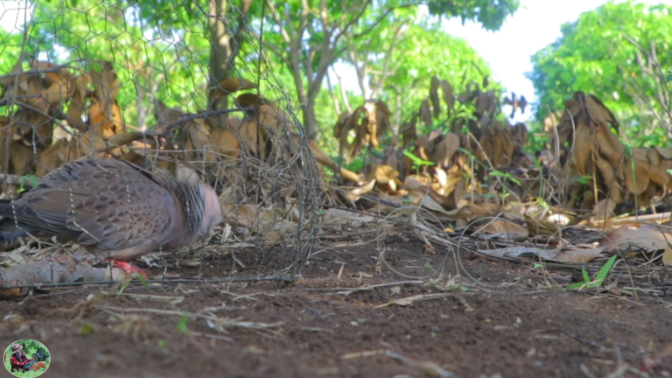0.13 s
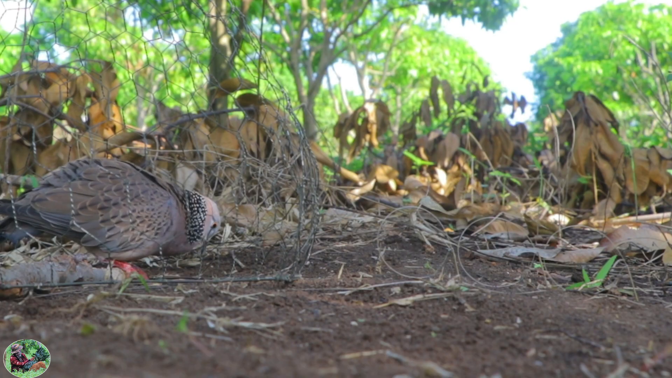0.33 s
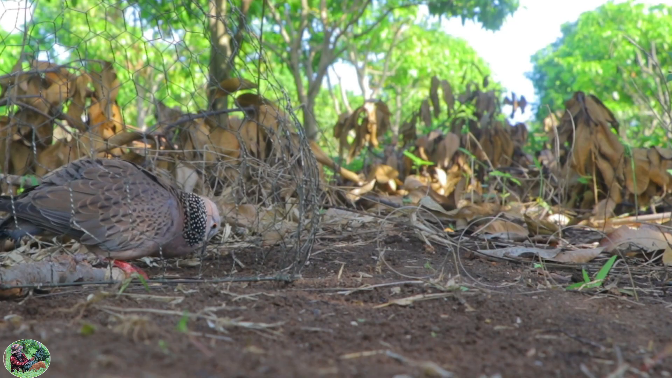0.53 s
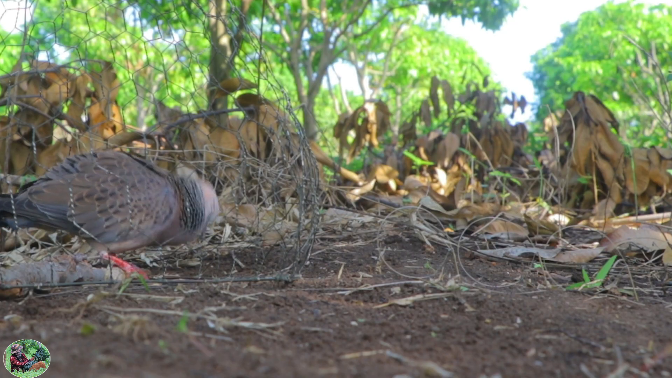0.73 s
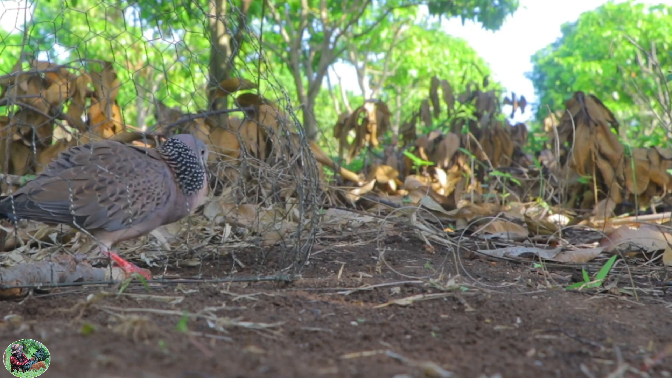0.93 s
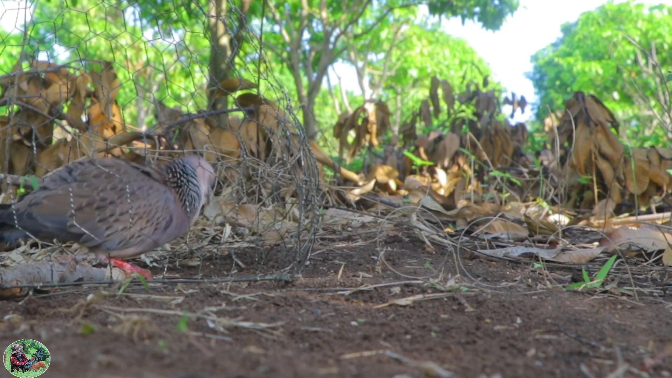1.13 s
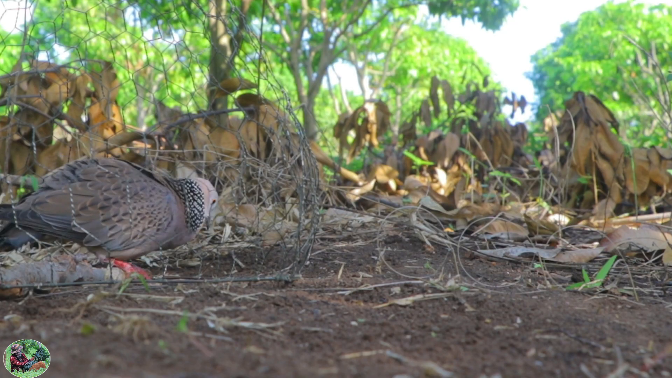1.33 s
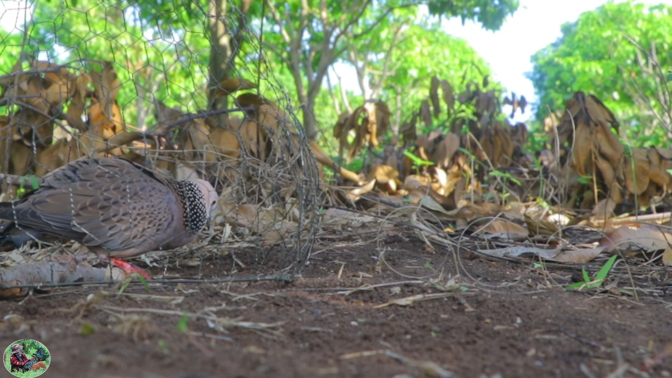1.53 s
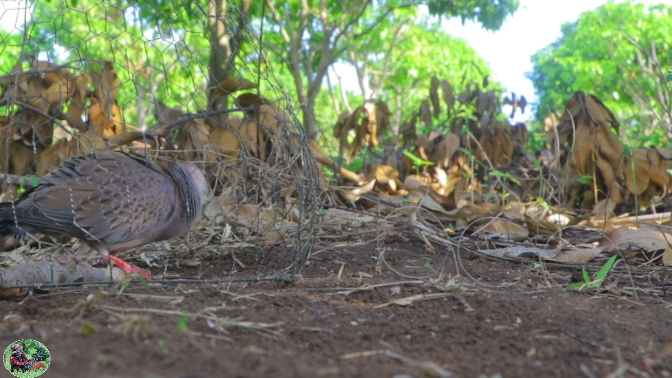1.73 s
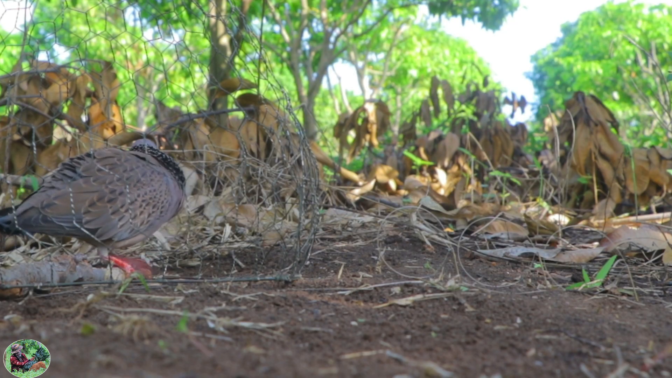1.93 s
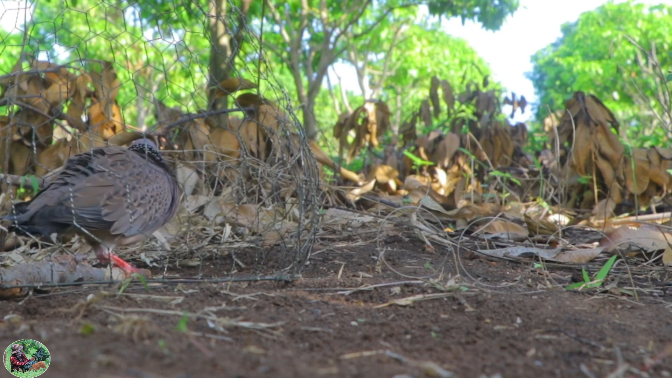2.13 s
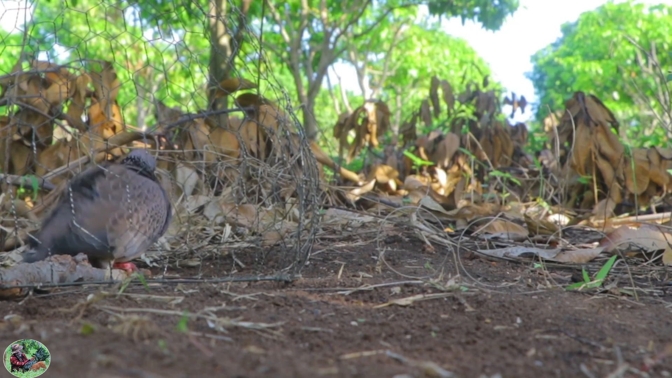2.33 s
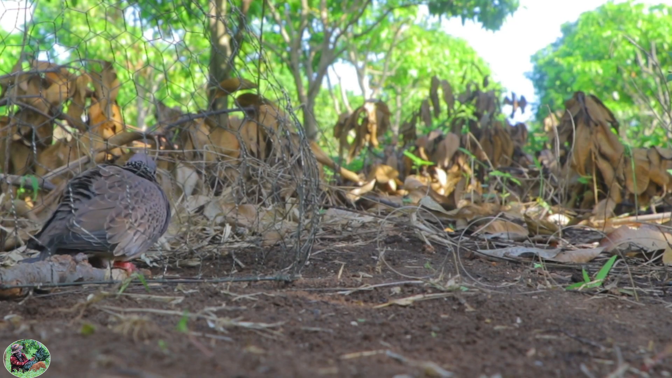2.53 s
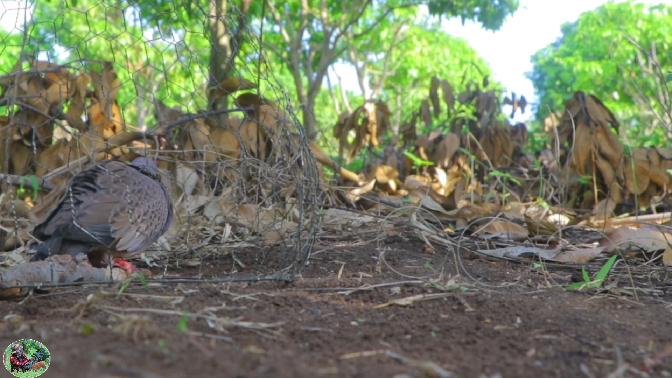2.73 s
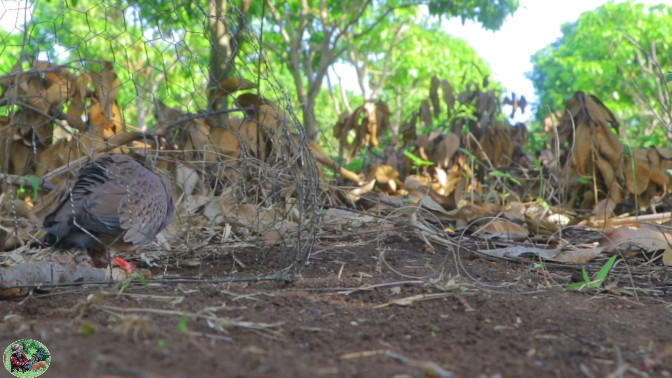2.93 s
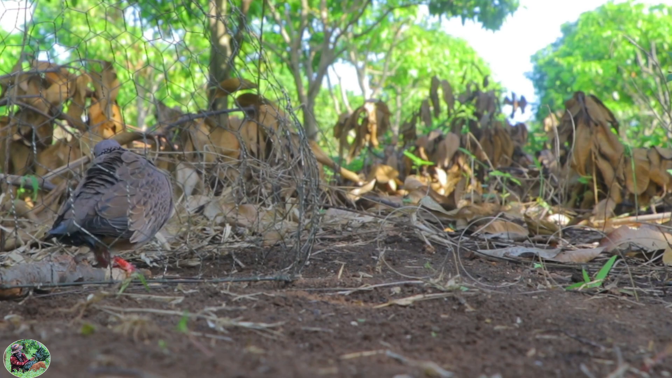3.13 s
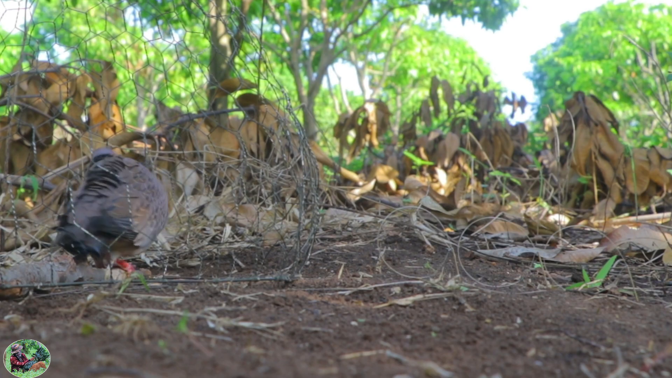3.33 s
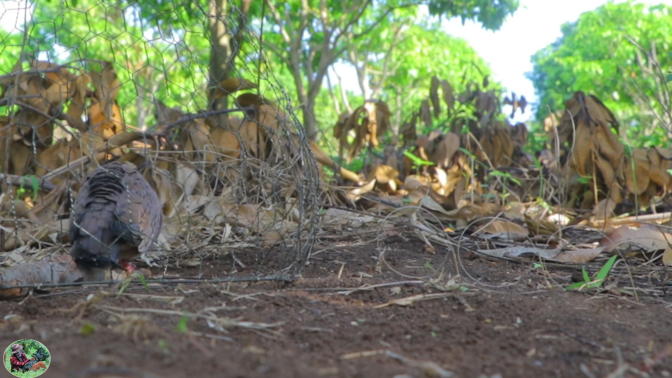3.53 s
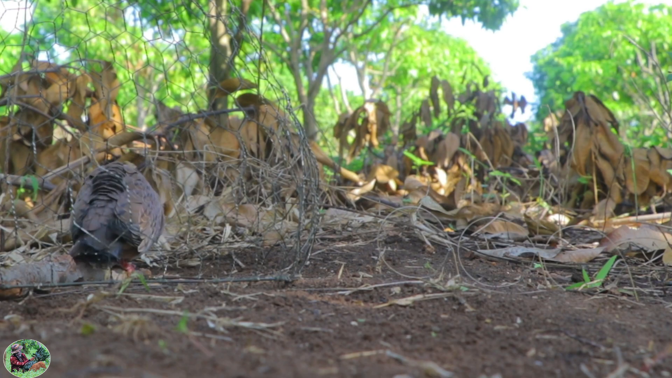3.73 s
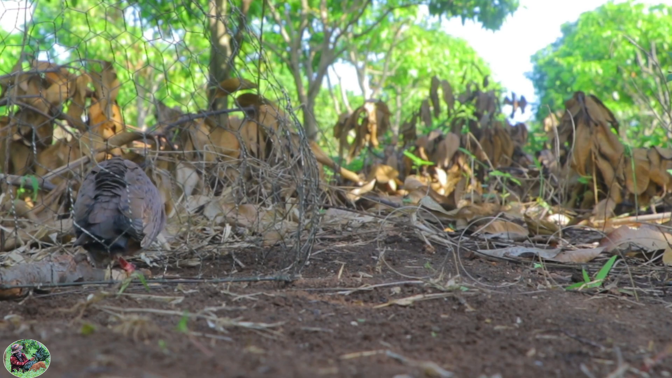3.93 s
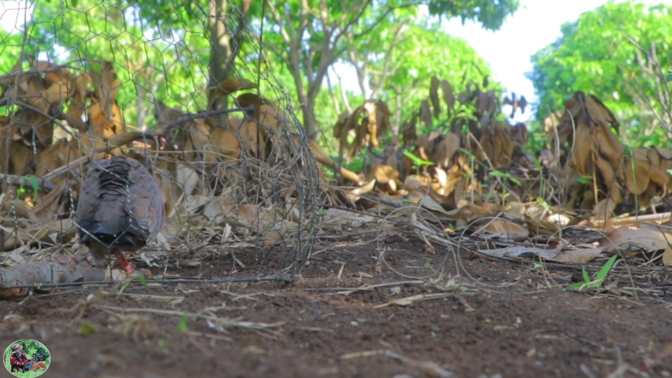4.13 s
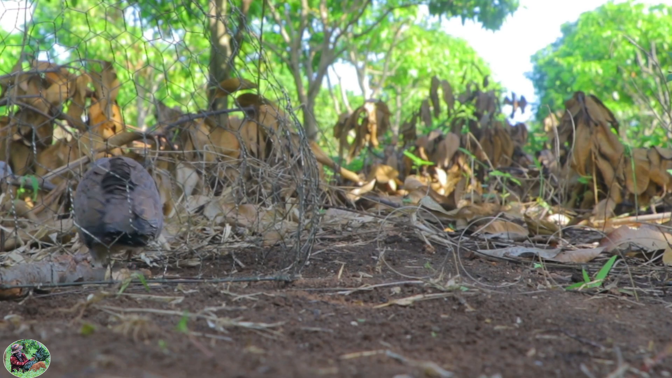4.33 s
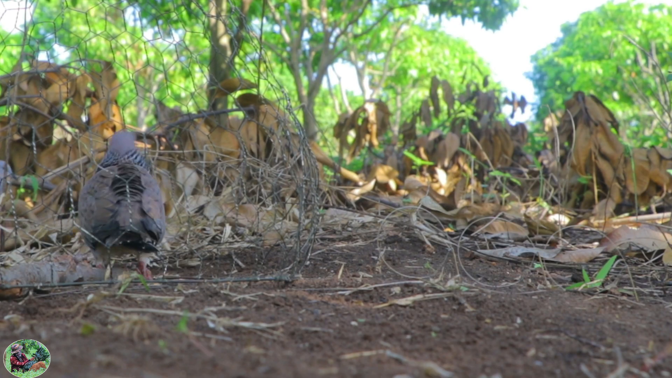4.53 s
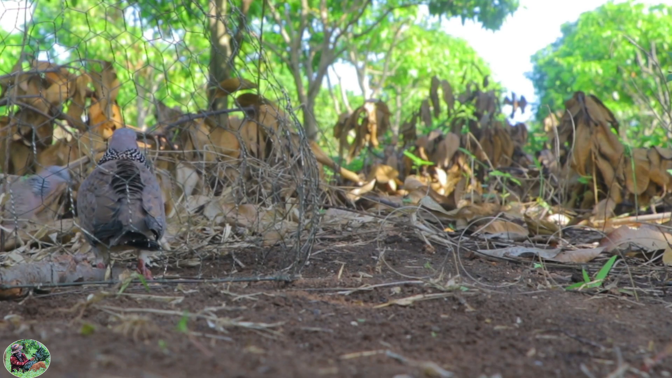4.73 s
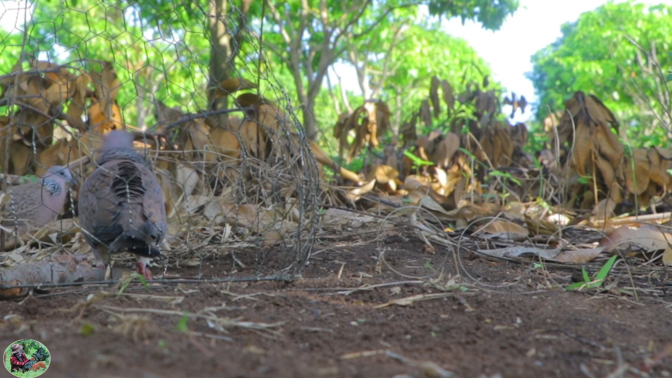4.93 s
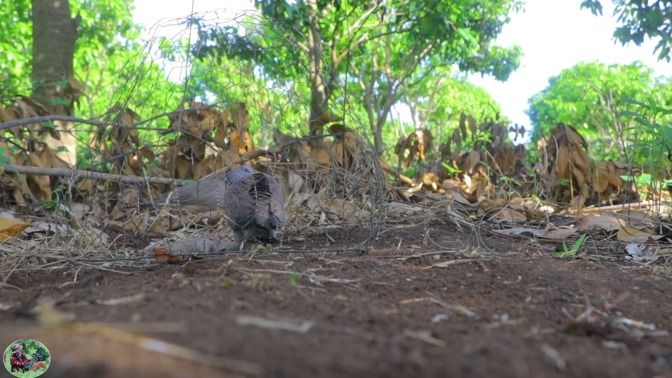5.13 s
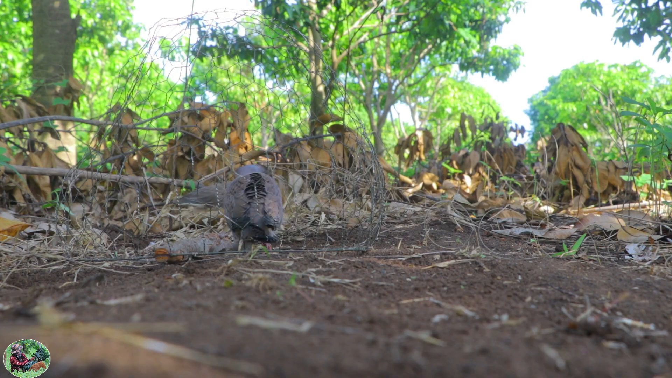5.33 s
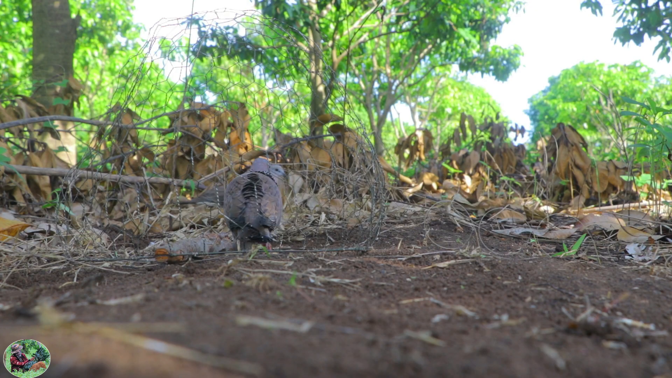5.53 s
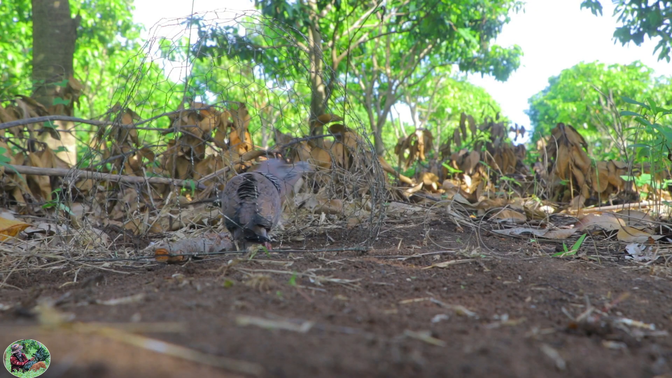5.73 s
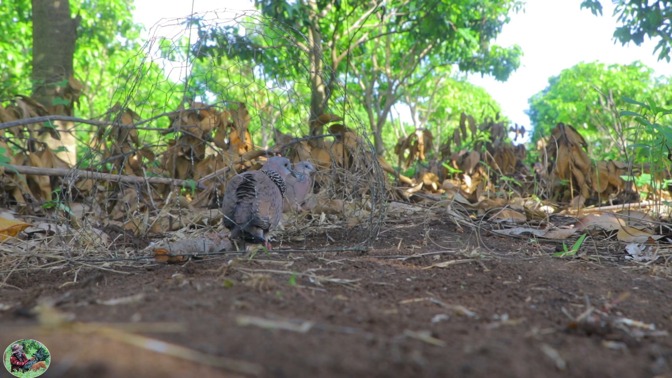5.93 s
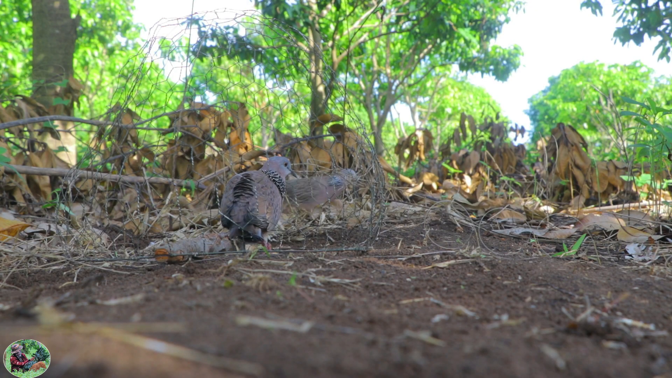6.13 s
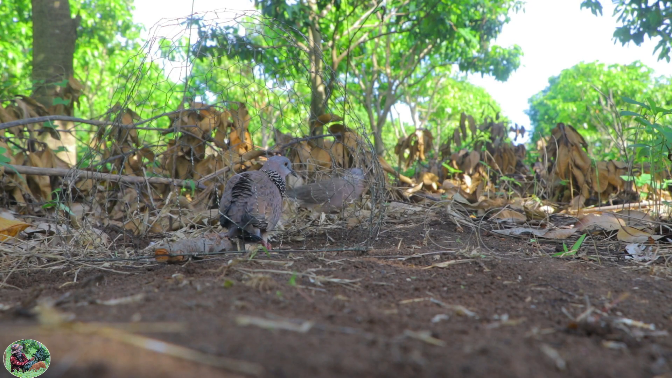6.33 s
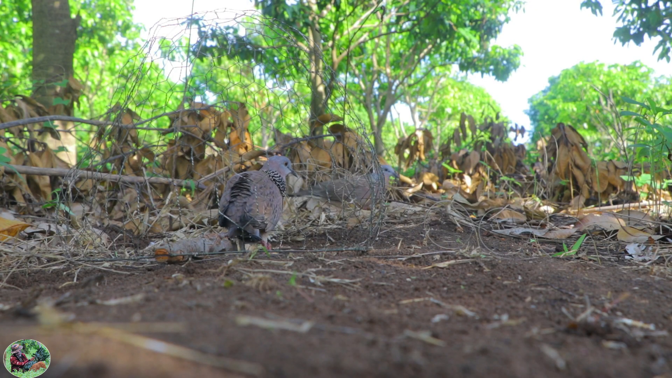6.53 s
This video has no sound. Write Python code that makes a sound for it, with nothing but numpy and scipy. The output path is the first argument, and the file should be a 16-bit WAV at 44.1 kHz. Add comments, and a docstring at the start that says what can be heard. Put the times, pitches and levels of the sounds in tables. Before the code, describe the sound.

Four evenly spaced dove coos fill the first four seconds, loud, dry and near, each a brief burr followed by a swelling hoot that breaks into a fading purr. Between them a high cicada chorus, airy foliage hiss and a distant idling rumble swell back as the recording level recovers. A small leaf crackle comes after the second coo; later the cooing stops, leaving insects, air and a few dry-leaf steps.

```python
"""Cicadas drone in the trees as a noise band, with thin insect buzzes, over hissing foliage, an idling engine and a hum.
A near spotted dove clicks its throat softly just before each of its four coos: a short burred note, then a long one that
rises to a pure tone and breaks into a lower purr, made of two vibrations beating together. The coos drive the recorder's
limiter hard, so the background ducks under each note and comes back. Dry leaves crackle between coos and at the end."""
import sys
import numpy as np
from scipy import signal
from scipy.fft import rfft, irfft
from scipy.io import wavfile
from scipy.ndimage import uniform_filter1d, minimum_filter1d

SR = 44100
rng = np.random.default_rng(int(sys.argv[2]) if len(sys.argv) > 2 else 0)


def int16_out(signal):
    """Quantize to a 16-bit WAV file."""
    q = np.round(np.clip(np.atleast_2d(signal).T, -1, 1) * 32767)
    wavfile.write(sys.argv[1], SR, q.astype(np.int16))


N = 290619
TIME = np.arange(N) / SR   # seconds
FREQS = np.maximum(np.arange(N // 2 + 1) * SR / N, 1)   # Hz


def from_db(db):
    """Turn decibels into a gain."""
    return 10 ** (np.asarray(db) / 20)


def rms_one(x):
    """Scale a sound to an average (rms) strength of 1."""
    return x / np.sqrt(np.mean(x ** 2) + 1e-20)


def ramp(x):
    """Hold at 0 below and at 1 above."""
    return np.clip(x, 0, 1)


def along(rows, where):
    """Join the columns of a table by straight lines and read them at the given places."""
    first, *columns = np.transpose(rows)
    return [np.interp(where, first, column) for column in columns]


def over_hz(points):
    """Read a table of pitch and value on a log-frequency axis."""
    hz, value = np.transpose(points)
    return np.interp(np.log(FREQS), np.log(hz), value)


def drift(rate):
    """Wander slowly at random with spread 1; a higher rate (Hz) wanders faster."""
    step = 20   # samples between computed points
    pole = np.exp(-2 * np.pi * rate * step / SR)
    settle = 4000   # points thrown away while the filter settles
    noise = rng.standard_normal(N // step + settle + 2)
    slow = signal.lfilter([1], [1, -2 * pole, pole * pole], noise)[settle:]
    return np.interp(np.arange(N) / step, np.arange(len(slow)), rms_one(slow))


def band(x, low_hz, high_hz, order=2):
    """Keep only the sound between two pitches (Butterworth band-pass)."""
    edges_hz = [low_hz, min(high_hz, .45 * SR)]
    return signal.sosfilt(signal.butter(order, edges_hz, "band", fs=SR, output="sos"), x + 1e-18)


def high_pass(x, low_hz, order):
    """Remove the sound below a pitch."""
    return signal.sosfilt(signal.butter(order, low_hz, "high", fs=SR, output="sos"), x)


def pan(balance_db):
    """Left and right gains for a given left-minus-right difference."""
    return from_db(np.array([[.5], [-.5]]) * balance_db)


def diffuse_noise(spectrum, balance_db):
    """Stereo noise from all around, of given dB per Hz; the two sides agree mostly in the bass."""
    # how alike left and right are: pitch_hz, likeness (0 unrelated, 1 identical)
    likeness = [(60, .94), (130, 0.45), (290, 0.064), (1400, 0.18), (3000, 0), (15000, 0.032)]
    mid, side = rfft(rng.standard_normal((2, N)))
    alike = np.clip(over_hz(likeness), -1, 1)
    both = np.sqrt(1 + alike) * mid + np.sqrt(1 - alike) * side * [[1], [-1]]
    return irfft(both * from_db(over_hz(spectrum)) * pan(balance_db), N) * np.sqrt(SR) / 2


def open_air(waver=0.16):
    """Foliage hiss over a far rumble: shaped noise whose lower bands each waver by themselves."""
    # open air and foliage, before the recorder's gain: pitch_hz, level_db (dB per Hz)
    air = [(22, -73.5), (33, -50.5), (62, -45.5), (120, -53.5), (200, -59), (340, -56), (600, -60.5),
           (1150, -63), (1800, -66), (3600, -69.5), (6000, -72), (9500, -72), (12500, -77), (15000, -82.5)]
    # side balance: pitch_hz, left_minus_right_db
    air_balance = [(60, 2.5), (200, -1), (690, -3), (2400, -2), (8000, -2), (15000, -0.5)]
    hiss = diffuse_noise(air, over_hz(air_balance)) * from_db(.5 * drift(6))
    edges_hz = np.geomspace(100, 3200, num=6)
    wavering = sum(band(hiss, low, high, order=1) * drift(8.9) for low, high in zip(edges_hz, edges_hz[1:]))
    return hiss + waver * wavering


def far_hum(centre_hz=333.4, half_width_hz=16, level_db=-44.5):
    """A narrow band of noise makes a faint, unsteady hum."""
    hum = band(rng.standard_normal((2, N)), centre_hz - half_width_hz, centre_hz + half_width_hz)
    return from_db(level_db) * rms_one(hum)


def engine(wander=.025):
    """A far idling engine: the firing rate and its octave are sines that waver together."""
    # engine tones, before the recorder's gain and panning: pitch_hz (average), level_db
    engine_lines = [(43.7, -29.5), (87.2, -33.5)]
    speed = np.cumsum(1 + wander * drift(3.3)) / SR
    return sum(from_db(db) * rms_one(np.sin(2 * np.pi * hz * speed)) for hz, db in engine_lines)


def cicadas(flutter_db=1.1, level_db=-.5, waver_db=1.9):
    """Many tymbals merge into one narrow noise band that flutters, wavers and now and then surges."""
    # slow rise of the chorus as the recorder's gain recovers: time_s, relative_level_db
    cicada_level = [(0, -34.5), (1.4, -29.5), (3.1, -33), (5.2, -29), (6.5, -25.5)]
    # colour of the chorus: pitch_hz, relative_level_db
    cicada_band = [(3900, -46.5), (4200, -10), (4450, -1.5), (4630, 0.5), (4705, 6), (4780, -3),
                   (4920, 1.5), (5025, 5), (5075, -2), (5125, 2), (5220, -7), (5330, -15), (5500, -43)]
    # one cicada surges out, computed as a lift of the whole band: time_s, gain_db, half_length_s
    cicada_surges = [(2.30, 10.5, 0.068), (2.53, 7.5, 0.05)]
    recovery_db, = along(cicada_level, TIME)
    surge_db = sum(db * np.exp(-((TIME - s) / half_s) ** 2) for s, db, half_s in cicada_surges)
    chorus_db = recovery_db + waver_db * drift(1.3) + surge_db
    flutter = from_db(flutter_db * np.array([drift(60), drift(60)]))
    return from_db(chorus_db + level_db) * rms_one(diffuse_noise(cicada_band, 0) * flutter)


def small_insects(half_width_hz=220):
    """Each buzz is a narrow wing resonance, made of filtered noise that fades in and out."""
    # thin buzzes: start_s, end_s, pitch_hz, level_db (before the fades)
    buzzes = [(-.05, .17, 7650, -44), (.3, .65, 7650, -44), (.66, .92, 6230, -48), (.85, 1.05, 7600, -47),
              (1.52, 2.07, 7750, -40), (3.55, 3.85, 7700, -45), (4.08, 4.3, 7650, -44),
              (5.27, 5.47, 7600, -40.5), (5.55, 5.76, 7620, -40.5), (5.88, 6.08, 7550, -39.5)]
    out = np.zeros((2, N))
    for start, end, hz, db in buzzes:
        inside = (TIME >= start) & (TIME < end)
        noise = rng.standard_normal((2, inside.sum()))
        buzz = rms_one(band(noise, hz - half_width_hz, hz + half_width_hz))
        out[:, inside] += from_db(db) * buzz * signal.windows.tukey(inside.sum(), .5)
    return out


def leaves(decay_s=0.013, grain_db=4):
    """Birds stir dry leaves: each step sets off a brief, fading burst of uneven noise grains."""
    # steps on the leaves: time_s, relative_level_db
    leaf_steps = [(2.041, -21.5), (2.078, -26), (5.402, -19), (5.713, -18.5), (5.738, -18), (6.144, -33),
                  (6.477, -47)]
    envelope = sum(from_db(db) * (TIME >= s) * np.exp(-np.abs(TIME - s) / decay_s) for s, db in leaf_steps)
    grains = rng.standard_normal((2, N)) * from_db(grain_db * np.minimum(rng.exponential(1, N), 4))
    return envelope * rms_one(band(grains, 920, 4000, order=1)) / 2


def throat_clicks(decay_s=0.0035, level_db=2, grit=0.98):
    """A short damped knock, part tone and part noise, as the throat fills."""
    # soft clicks just before each coo: time_s, relative_level_db, pitch_hz
    clicks = [(0.108, -22.5, 780), (0.177, -22.5, 960), (1.132, -23.5, 914), (1.187, -21, 933),
              (2.319, -17, 881), (3.469, -16.5, 1020)]
    out, age = np.zeros(N), TIME[:SR // 10]
    for s, db, hz in clicks:
        noise = rms_one(band(rng.standard_normal(len(age)), 750, 1250))
        knock = (np.sin(2 * np.pi * hz * age) + grit * noise) * np.exp(-age / decay_s)
        first = int(s * SR)
        out[first:first + len(age)] += from_db(db + level_db) * knock / np.abs(knock).max()
    return band(out, 500, 1500)


def short_note(t, start, end):
    """An arch that scoops up and sags; it is loudest and most burred where it is highest."""
    scoop, scoop_s, sag = 0.28, .0215, .17   # scoop and sag as shares of the note's pitch
    top_db, db_per_octave = 13, 27.5
    top_burr, burr_per_octave = .9, 1.3   # burr depth 0-1
    attack_s, attack_db = .008, 20.5
    age = t - start
    ratio = 1 - scoop * np.exp(-(age / scoop_s) ** 2) - sag * (age / (end - start)) ** 2
    octaves = np.log2(ratio)
    level_db = top_db + db_per_octave * octaves - attack_db * ramp(1 - (age / attack_s) ** 2)
    return ratio, level_db, top_burr + burr_per_octave * octaves


def long_note(t, start, pure_from, break_at, end, break_s):
    """A burred climb to a pure tone that sags a little, then breaks down into a fading purr."""
    # climb, sags and drop are shares of the top pitch; burr depths run 0-1
    climb, climb_db, climb_burr = 0.43, 11.5, .52
    attack_s, attack_db = .033, 25
    pure_db, pure_sag, pure_burr, settle_s = 17.5, .076, 0.044, 0.038
    linger_burr, linger_s = 0.1, 0.022   # the burr is slow to leave the pure tone
    purr_drop, purr_sag = .175, .125
    purr_db, purr_fade_db, purr_burr = 12, 12.5, 0.35
    to_climb = ramp((pure_from - t) / (pure_from - start))
    held = ramp((t - pure_from) / (break_at - pure_from))
    spent = ramp((t - break_at) / (end - break_at))

    tone_ratio = 1 - climb * to_climb - pure_sag * held ** 2
    tone_db = pure_db - climb_db * to_climb - attack_db * ramp(1 - (t - start) / attack_s)
    lingering = linger_burr * np.exp(-np.abs(t - pure_from) / linger_s)
    tone_burr = pure_burr + climb_burr * ramp((pure_from - t) / settle_s) + lingering
    tone = np.array([tone_ratio, tone_db, tone_burr])

    purr_ratio = 1 - purr_drop - purr_sag * spent
    purr = np.array([purr_ratio, purr_db - purr_fade_db * spent, np.full(len(t), purr_burr)])
    return tone + (purr - tone) * ramp(.5 + (t - break_at) / break_s)


def coo_controls():
    """Pitch, strength, burr depth and burr rate; each note ends as the pressure gives out."""
    # short notes: start_s, end_s, pitch_hz (scales the arch), relative_level_db, burr_beats_per_s
    short_notes = [(.205, .359, 642, 0, 101), (1.214, 1.372, 626, 0, 104), (2.346, 2.508, 640, -.5, 106),
                   (3.494, 3.660, 635, -.5, 108)]
    # long notes: start_s, pure_from_s, break_s (its middle), end_s, top_pitch_hz, break_length_s,
    # burr_beats_per_s
    long_notes = [(.467, .520, .700, .884, 711, .016, 118), (1.473, 1.531, 1.705, 1.873, 716, .018, 122),
                  (2.601, 2.660, 2.860, 3.020, 726, .008, 123),
                  (3.750, 3.822, 3.975, 4.151, 713, .004, 120)]
    release_s, release_drop, release_db = 0.023, 0.22, 22.5   # drop as a share of the note's pitch
    controls = np.zeros((4, N))

    def place(inside, end, hz, beats, note_db, shape):
        ratio, level_db, burr = shape
        dying = ramp(1 - (end - TIME[inside]) / release_s) ** 2   # pitch and level fall together
        pitch_hz = hz * (ratio - release_drop * dying)
        strength = from_db(note_db + level_db - release_db * dying)
        controls[:, inside] = pitch_hz, strength, ramp(burr), np.full(len(burr), beats)

    for start, end, hz, db, beats in short_notes:
        inside = (TIME >= start) & (TIME < end)
        place(inside, end, hz, beats, db, short_note(TIME[inside], start, end))
    for start, pure_from, break_at, end, hz, break_s, beats in long_notes:
        inside = (TIME >= start) & (TIME < end)
        shape = long_note(TIME[inside], start, pure_from, break_at, end, break_s)
        place(inside, end, hz, beats, 0, shape)
    return controls


def syrinx(hz, burr, beats, jitter=.019, pure_jitter=0.0025, throb=0.12):
    """A near sine, with a second vibration just above it that beats against it in rounded burr pulses."""
    phase = 2 * np.pi * np.cumsum(hz * (1 + (pure_jitter + jitter * burr) * drift(70))) / SR
    beat = 2 * np.pi * np.cumsum(beats * (1 + .09 * drift(50))) / SR
    # between two pulses the membranes nearly stop and restart a little out of step
    pulse_number = (beat / (2 * np.pi) + .5).astype(int)
    slips = np.diff(pulse_number, prepend=0) * np.minimum(burr, .8) ** 2 * rng.normal(0, 1.6, N)
    smoothing = np.hanning(SR // 300)
    phase = phase + np.cumsum(np.convolve(slips, smoothing / smoothing.sum(), "same"))
    upper = burr * np.exp(.25 * drift(60))   # strength of the second vibration
    throbbing = 1 + throb * burr * np.cos(beat)
    pulses = (1 + upper * np.exp(1j * beat)) * throbbing / np.sqrt(1 + upper ** 2)
    return phase, pulses


def dove(second_db=-46.5, third_db=-53, burr_second_db=-28.0, throat_hz=1260, rasp_db=-35, edge_rasp_db=-17):
    """The coo as it leaves the swollen throat, with faint overtones and a rasp at its edges."""
    hz, strength, burr, beats = coo_controls()
    phase, pulses = syrinx(hz, burr, beats)
    rough = np.minimum(burr / .3, 1) ** 2
    tone = np.exp(1j * phase) * pulses
    overtones = from_db(second_db) * tone ** 2 + from_db(third_db) * tone ** 3
    shimmer = from_db(.5 * burr * drift(50))
    voice = strength * shimmer * np.real(tone + overtones)
    # the burr has a stronger octave, which the closed beak muffles more and more as it climbs
    muffle = (550 / np.maximum(hz, 430)) ** 4
    octave = np.real(np.exp(2j * phase) * pulses) * rough * strength * muffle
    octave = from_db(burr_second_db) * band(octave, 850, throat_hz, order=7)
    # the vibration is irregular where it starts and dies, at weak pressure
    edge = np.minimum(strength * 3, 1) / (1 + strength / 2)
    rasp_level = rough * (from_db(rasp_db) * strength + from_db(edge_rasp_db) * edge)
    rasp = rasp_level * rms_one(band(rng.standard_normal(N), 400, 1045, order=6))
    # so small a body radiates almost nothing below its lowest note
    return high_pass(voice + octave + rasp, 345, order=7)


def at_microphones(x, left_lag_s=7e-5):
    """The near bird reaches the left capsule a little later and weaker."""
    both = np.array([np.interp(TIME - left_lag_s, TIME, x), x])
    return both * pan(-.85)


def grove(x, t60=0.77, level_db=-41):
    """Trunks and leaves scatter a faint short tail: fading random echoes, different on each side."""
    age = TIME[:SR // 2]
    fade = from_db(-60 * age / t60)   # t60: seconds to fall by 60 dB
    echoes = rng.standard_normal((2, len(age))) * fade * (age > .008)
    echoes /= np.sqrt(np.sum(echoes ** 2, axis=1, keepdims=True))
    return from_db(level_db) * signal.fftconvolve(x[None], echoes, axes=1)[:, :N]


def scene():
    """The near dove over the background of air, engine, insects and leaves."""
    # slow recovery of the recorder's gain after the coos, heard on air, hum and engine: time_s, gain_db
    gain_recovery = [(0, -5), (2, -3), (4.2, -2.5), (5.2, 1), (6.6, 1.2)]
    recovery_db, = along(gain_recovery, TIME)
    distance = from_db(recovery_db) * (open_air() + far_hum() + engine() * pan(0.86))
    background = distance + cicadas() + small_insects() + leaves()
    bird = throat_clicks() + dove()
    return at_microphones(bird) + grove(bird) + background


def record(dry, ceiling_db=0.31, release_s=0.2, look_ahead_s=0.0016, low_cut_hz=29, top_cut_hz=15150):
    """A low cut, then a look-ahead limiter that holds the peaks and lets go slowly; the top is cut."""
    dry = high_pass(dry, low_cut_hz, order=4)
    peak_db = 20 * np.log10(np.abs(dry).max(axis=0) + 1e-9)
    over_db = np.maximum(peak_db - ceiling_db, 1e-6)
    size = int(look_ahead_s * SR)
    held_db = -minimum_filter1d(-over_db, size)   # highest excess nearby
    # the cut jumps up with each peak, then shrinks exponentially
    cut_db = np.exp(np.maximum.accumulate(np.log(held_db) + TIME / release_s) - TIME / release_s)
    smooth_cut_db = uniform_filter1d(uniform_filter1d(cut_db, size), size // 2)
    limited = dry * from_db(-smooth_cut_db)
    return signal.sosfilt(signal.ellip(10, .1, 80, top_cut_hz, fs=SR, output="sos"), limited)


dry = scene()
out = record(dry)
int16_out(out)
```